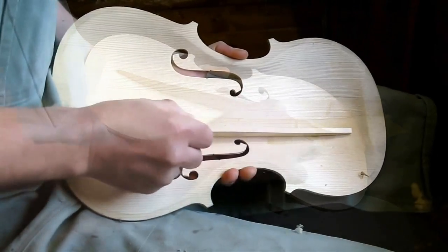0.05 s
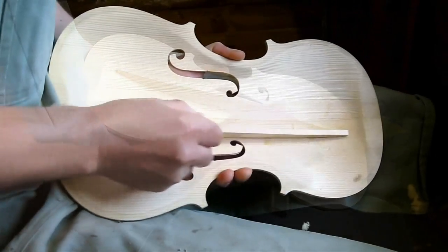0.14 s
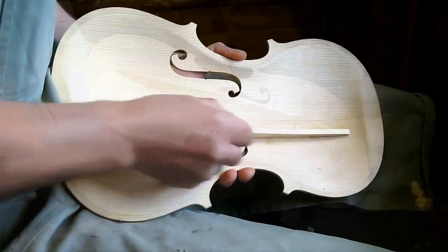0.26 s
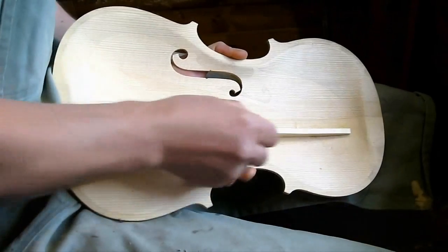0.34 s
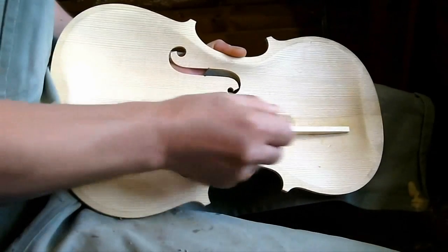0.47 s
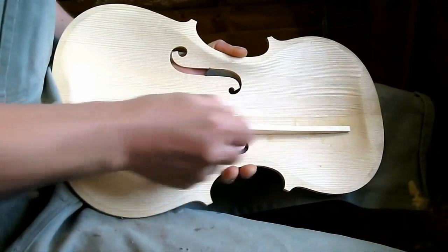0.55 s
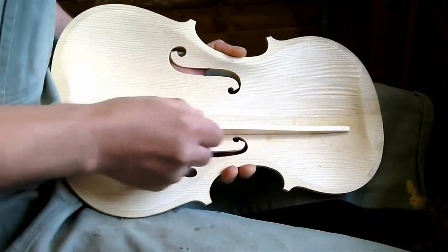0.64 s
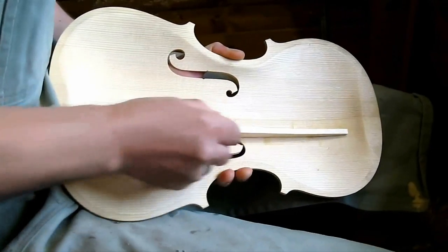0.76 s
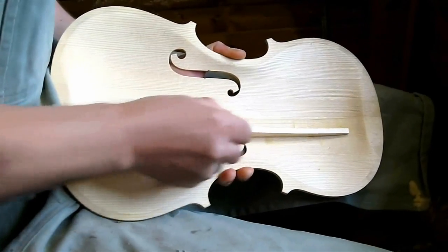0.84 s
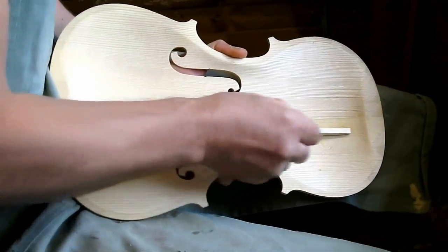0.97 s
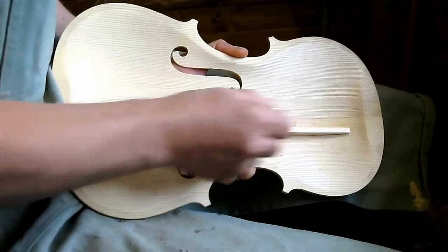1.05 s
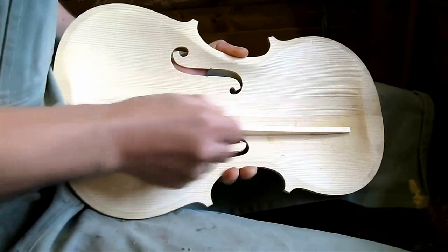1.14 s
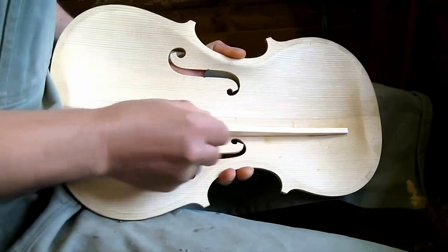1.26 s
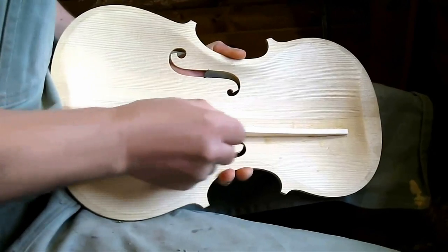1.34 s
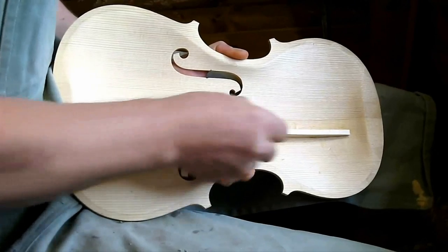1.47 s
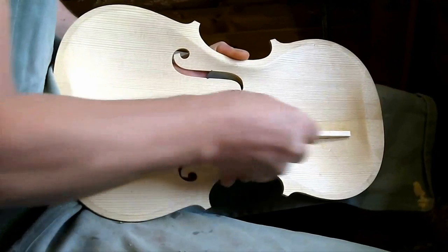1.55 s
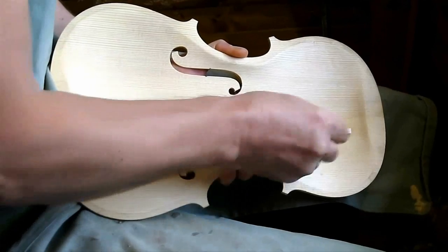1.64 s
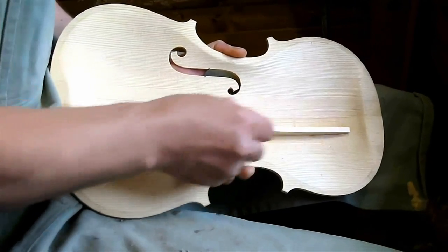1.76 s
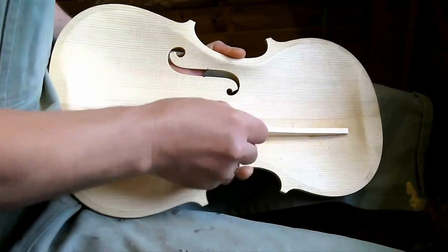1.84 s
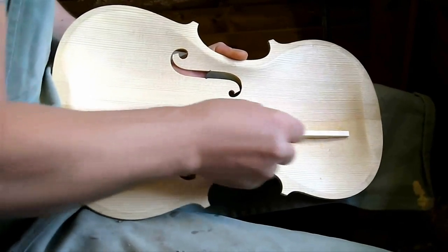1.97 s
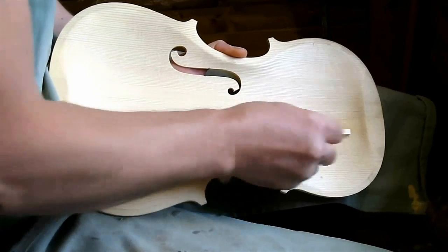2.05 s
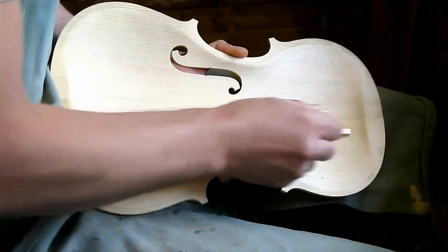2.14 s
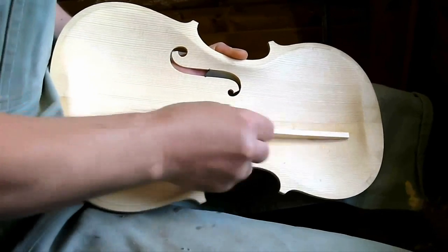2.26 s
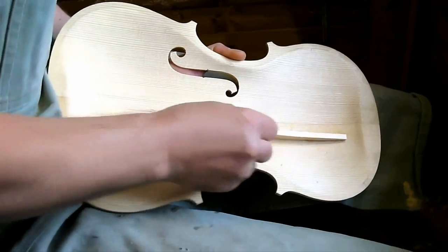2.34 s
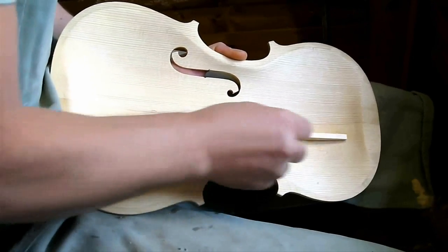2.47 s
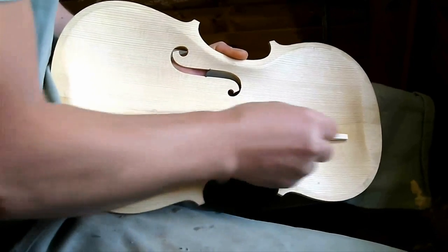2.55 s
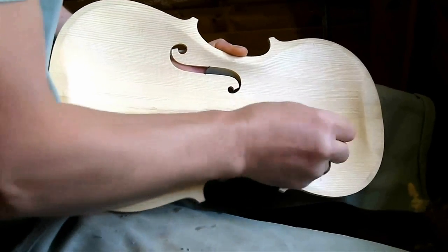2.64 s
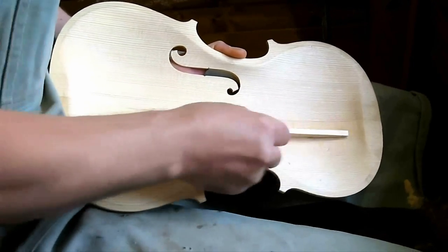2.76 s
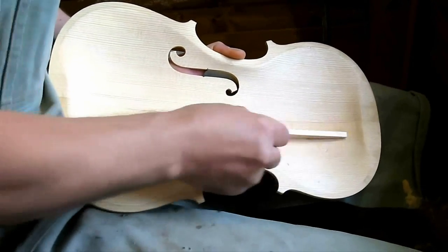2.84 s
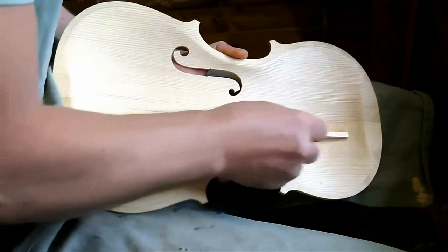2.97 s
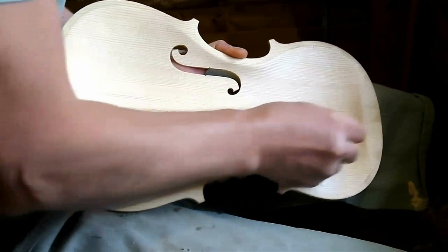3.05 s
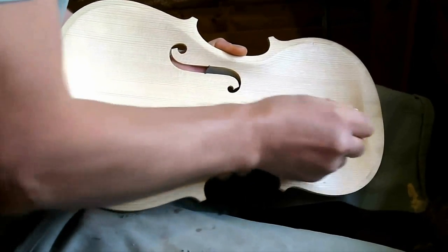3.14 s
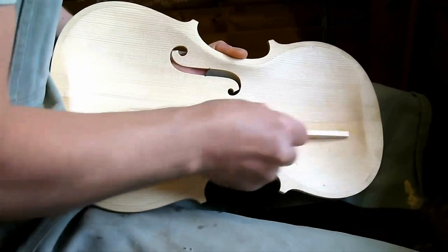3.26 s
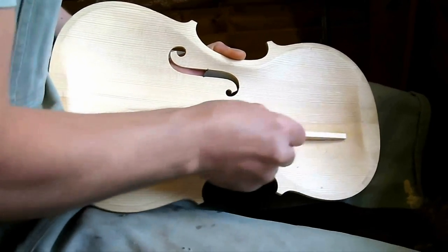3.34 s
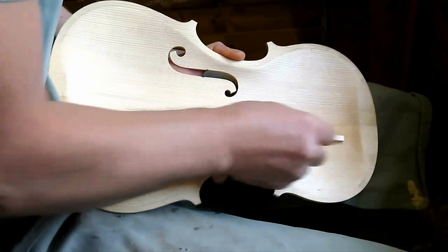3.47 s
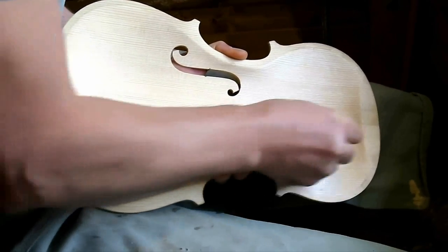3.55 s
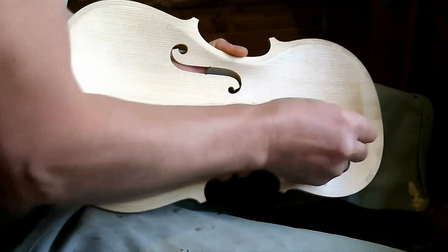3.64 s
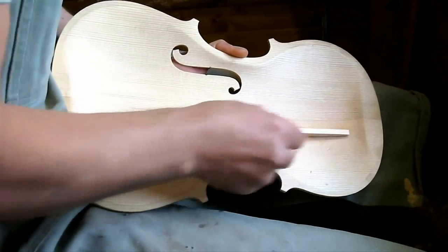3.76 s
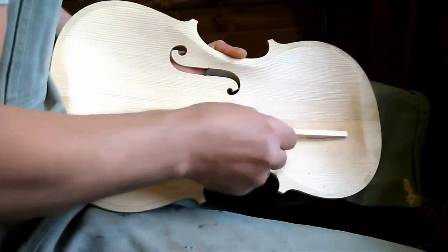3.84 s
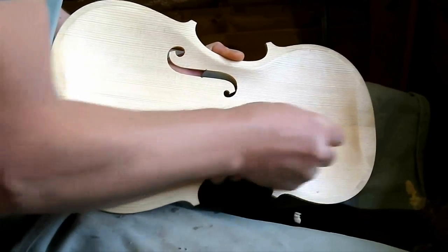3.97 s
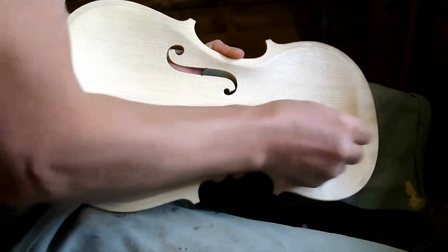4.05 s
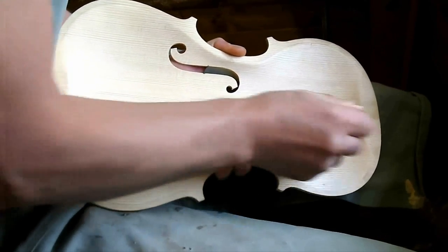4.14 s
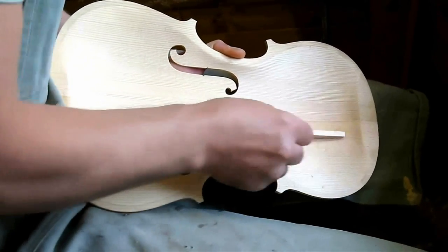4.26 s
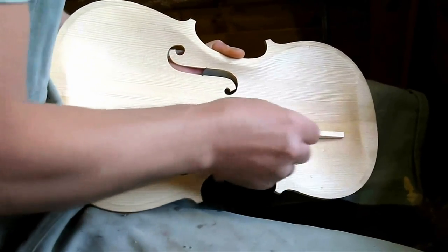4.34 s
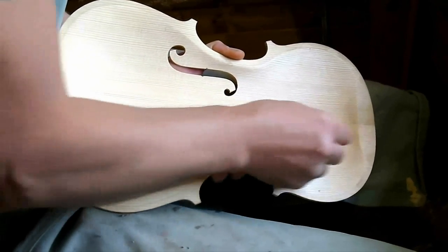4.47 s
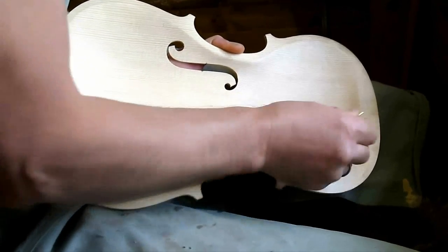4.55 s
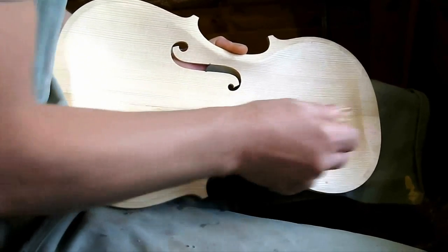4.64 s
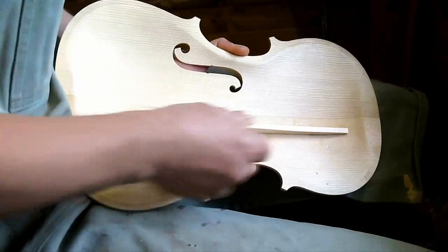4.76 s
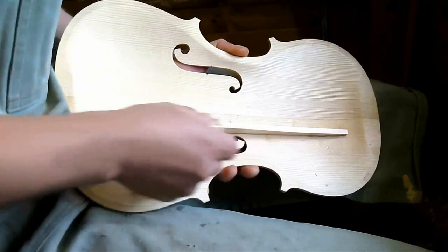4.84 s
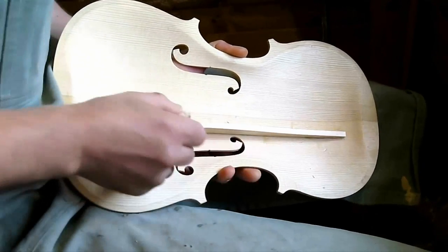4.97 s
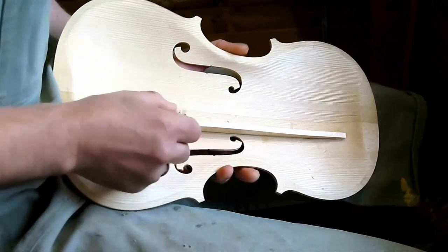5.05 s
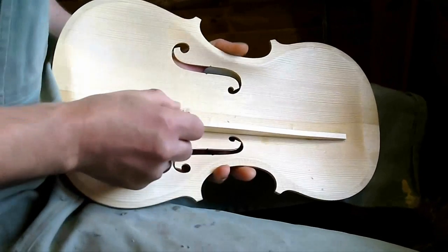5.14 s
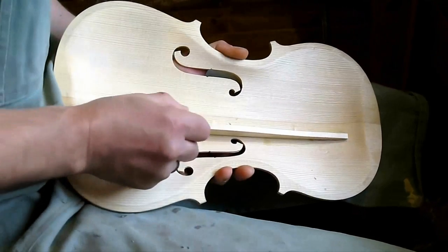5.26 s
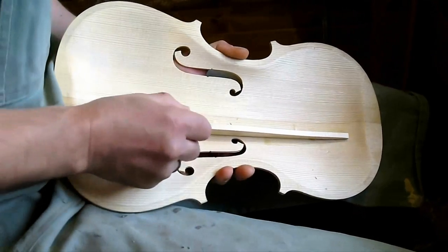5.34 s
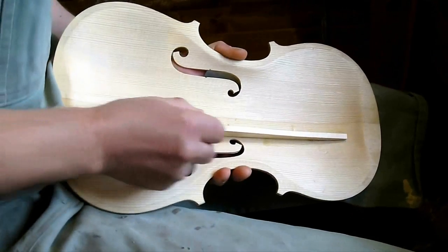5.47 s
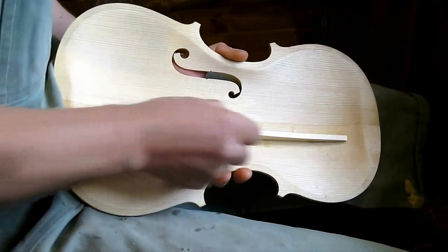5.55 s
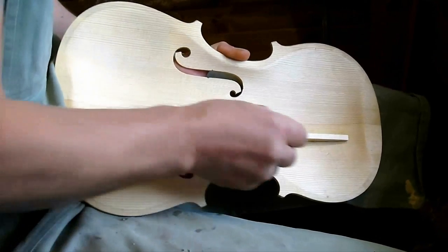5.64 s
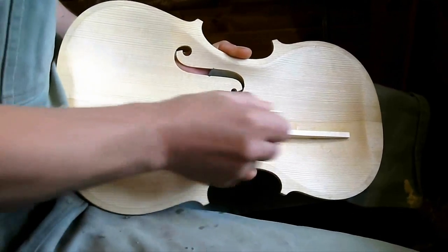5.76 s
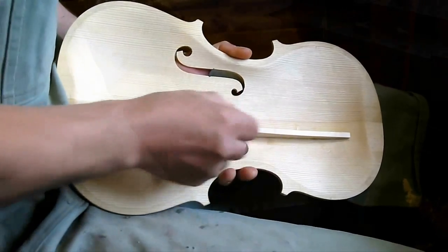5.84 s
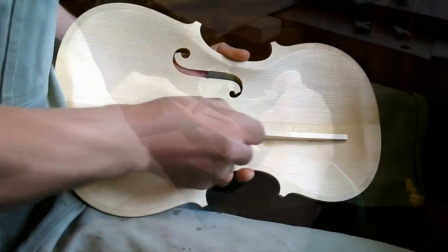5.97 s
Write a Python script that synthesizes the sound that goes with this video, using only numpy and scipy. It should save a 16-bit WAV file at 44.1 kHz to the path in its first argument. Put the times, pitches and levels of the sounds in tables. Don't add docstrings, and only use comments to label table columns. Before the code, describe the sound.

Woodworking heard very near: blade set down with a hard clack, then pushed, tearing fibres in stuttering lumps while the arched plate resonates in the midrange and the shaving hisses high. Short rushed scrapes first, then regular knock-and-push strokes, becoming lighter, a brief near-pause with tiny splinter ticks, one loosely gripped tap and a final rough stroke. Short, live room reflections, little bass, steady faint air noise, knocks clipping.

```python
import sys
import numpy as np
from scipy import signal
from scipy.io import wavfile

SR = 44100
rng = np.random.default_rng(int(sys.argv[2]) if len(sys.argv) > 2 else 0)


def wav_record(signal):
    frames = np.transpose(np.atleast_2d(signal))
    bounded = np.clip(frames, -1, 1)
    quanta = np.round(bounded * 32767).astype(np.int16)
    wavfile.write(sys.argv[1], SR, quanta)


def linear_from_db(decibels):
    return 10 ** (np.asarray(decibels, float) / 20)


N = 264587
LEFT_RIGHT = np.array([[1], [-1]])


def rms_one(x):
    return x / np.sqrt(np.mean(x ** 2) + 1e-20)


def low(x, hz):
    return signal.sosfilt(signal.butter(2, hz, fs=SR, output="sos"), x)


def high(x, hz):
    return signal.sosfilt(signal.butter(4, hz, "high", fs=SR, output="sos"), x)


def at_hz(points, hz, axis=1):
    points = np.array(points)
    return np.interp(np.log(hz), np.log(points[:, 0]), points[:, axis])


def drift(rate):
    r = np.exp(-40 * np.pi * rate / SR)
    slow = signal.lfilter([1], [1, -2 * r, r * r], rng.standard_normal(N // 20 + 2002))[2000:]
    return np.interp(np.arange(N) / 20, np.arange(len(slow)), rms_one(slow))


def ring(force, hz, t60):
    r, w = linear_from_db(-60 / (t60 * SR)), 2 * np.pi * hz / SR
    return signal.lfilter([0, np.sin(w)], [1, -2 * r * np.cos(w), r * r], force + 1e-18)


def clicks(times_s, db):
    out = np.zeros(N)
    out[(np.array(times_s) * SR).astype(int)] = linear_from_db(db)
    return out


def bands(low_hz, high_hz):
    edges = low_hz * 2 ** np.arange(0, np.log2(high_hz / low_hz) + .01, 1 / 3)
    return [(np.sqrt(a * b), signal.butter(2, [a, b], "band", fs=SR, output="sos"))
            for a, b in zip(edges, edges[1:])]


# (f/Hz, likeness/share)
LIKENESS = [(60, 0.66), (240, 1), (950, 0.53), (3770, 0.076), (15000, 0.38)]


def widen(mid, side, hz, alike_share):
    alike = np.clip(alike_share * at_hz(LIKENESS, hz), 0, 1)
    return np.sqrt(1 + alike) * mid + np.sqrt(1 - alike) * side * LEFT_RIGHT


# (f/Hz, left minus right level/dB)
LEAN = [(60, -0.5), (240, 0), (950, -1), (3770, -4.5), (15000, -1)]


def lean_gains(hz):
    return linear_from_db(at_hz(LEAN, hz) / 2 * LEFT_RIGHT)


def coloured(whites, spectrum, low_hz, high_hz, patchy_db, alike_share):
    out = 0
    for k, (hz, sos) in enumerate(bands(low_hz, high_hz)):
        mid, side = signal.sosfilt(sos, whites[k % 2])
        gain = linear_from_db(at_hz(spectrum, hz) + patchy_db * drift(11.0))
        out = out + gain * lean_gains(hz) * widen(mid, side, hz, alike_share)
    return rms_one(out)


def stroke(start_s, top_s, end_s, start_db, top_db, end_db, release_db_per_s):
    t = np.arange(0, N, 32) / SR
    held = np.interp(t, [start_s, np.clip(top_s, start_s, end_s), end_s], [start_db, top_db, end_db])
    onset_db_per_s = 899.5
    before_s, after_s = np.maximum(start_s - t, 0), np.maximum(t - end_s, 0)
    return held - onset_db_per_s * before_s - release_db_per_s * after_s


# (start t/s, lift t/s, top speed as hiss level/dB, climb to it/dB, rasp of the grain/dB)
SLIDES = [(0, 0.043, -55.5, -6, 0.5), (0.084, 0.178, -42, 3, -1.5), (0.225, 0.344, -45.5, -3.5, -3.5),
          (0.387, 0.503, -37.5, 4.5, -1), (0.873, 1.075, -36, 9.5, -1.5), (1.395, 1.694, -36.5, 15.5, 0),
          (1.964, 2.19, -42, 15, 1.5), (2.453, 2.705, -40, 16.5, 2), (2.946, 3.212, -40, 14, 0.5),
          (3.473, 3.682, -40, 14.5, -2.5), (3.98, 4.153, -43, 11, 3), (4.428, 4.622, -43, 13.5, 1.5),
          (4.87, 5.06, -71.5, 5, 8), (5.12, 5.18, -66, 7, 8.5), (5.357, 5.367, -52.5, 12, 7.5),
          (5.519, 5.763, -37, 13.5, 3.5)]
# (bites t/s, deepest t/s, leaves t/s, depth as plate level/dB, weight on the lap/dB)
CUTS = [(0, 0.01, 0.16, -42, -18.5), (.2, 0.218, 0.25, -36, -16), (.26, 0.292, 0.37, -29.5, -19),
        (0.378, 0.406, 0.47, -17.5, -30.5), (0.426, 0.482, 0.5, -19.5, -27.5),
        (0.889, 0.938, .98, -19, -23), (0.967, 1.024, 1.055, -16, -25), (1.369, 1.443, 1.58, -25.5, -16.5),
        (1.494, 1.548, 1.675, -17, -23.5), (1.987, 2.054, 2.074, -26.5, -31),
        (2.045, 2.106, 2.2, -23, -33.5), (2.453, 2.561, 2.597, -23.5, -33),
        (2.627, 2.636, 2.697, -26, -25.5), (2.934, 3.039, 3.153, -29, -34),
        (3.47, 3.543, 3.635, -30.5, -37), (3.655, 3.684, 3.677, -24, -25.5),
        (3.956, 3.978, 4.09, -33.5, -31), (4.077, 4.12, 4.15, -38, -19.5), (4.437, 4.45, 4.62, -39, -16.5),
        (4.549, 4.59, 4.525, -32.5, -21), (5.126, 5.162, 5.14, -44, -19),
        (5.512, 5.563, 5.82, -26.5, -24.5), (5.61, 5.654, 5.66, -23.5, -12.5), (5.7, 5.74, 5.665, -18, -32)]


def pushes():
    speed_up_share = .8
    bite_loss_db, leave_loss_db = 9, 5
    slides = np.array([stroke(a, a + speed_up_share * (b - a), b, db - climb_db, db, db, 301)
                       for a, b, db, climb_db, _ in SLIDES])
    cuts = np.array([stroke(a, m, b, db - bite_loss_db, db, db - leave_loss_db, 253)
                     for a, m, b, db, _ in CUTS])
    depth = cuts.max(axis=0)
    lap = (cuts + np.array(CUTS)[:, 4:]).max(axis=0)
    by_speed, by_depth, skimming_db = 0.96, 0.19, -55
    rasp = (by_speed * (slides + 40) + np.array(SLIDES)[:, 4:]).max(axis=0)
    chatter = -33 + rasp + by_depth * (np.maximum(depth, skimming_db) + 28.5)
    return [np.repeat(linear_from_db(db), 32)[:N] for db in (depth, lap, chatter, slides.max(axis=0))]


def fibres(per_s, spread_db, judder_db):
    sizes = linear_from_db(spread_db * np.minimum(rng.exponential(1, N), 5)) * rng.choice([-1, 1], N)
    torn = rng.random(N) < per_s / SR
    return rms_one(sizes * torn * linear_from_db(judder_db))


def modes(table, tearing, blows, place_db, turn):
    out, steady, struck = 0, 0, np.flatnonzero(blows)
    for k, (hz, level_db, t60) in enumerate(table):
        t60 = min(t60, 34 / hz)
        steady += linear_from_db(2 * level_db) * t60 * SR / (4 * np.log(1000))
        force = linear_from_db(place_db * drift(4.0)) * tearing
        force[struck] += blows[struck] * linear_from_db(rng.normal(0, 3, len(struck)))
        sound = (-1) ** k * linear_from_db(level_db) * ring(force, hz, t60)
        aim, lag = rng.normal(0, 1, 2)
        lean = linear_from_db(at_hz(LEAN, hz) / 2 + aim)
        shift = int(np.clip(abs(turn * lag), 0, 9))
        left = lean * np.roll(sound, shift * (lag > 0))
        right = np.roll(sound, shift * (lag < 0)) / lean
        out = out + np.array([left, right])
    return out / np.sqrt(steady)


# (f/Hz, level/dB, t60/s)
PLATE = [(403, -35, 0.014), (476, -6, 0.027), (504, -35, .045), (531.3, 0.5, 0.11), (557.5, -6, 0.12),
         (600, -12.5, 0.1), (682, -0.5, 0.057), (640.5, 8.5, 0.029), (719, 4, 0.05), (813, 14, 0.019),
         (890, 1, 0.042), (898, 5, 0.06), (978, 10, 0.018), (1054, 10.5, 0.02), (1200, 6, 0.0086),
         (1277, -2, 0.063), (1244, 0, 0.09), (1367, 3.5, 0.035), (1400, -16.5, 0.0223), (1508, -7, 0.04),
         (1720, -17, 0.042)]


def plate_rings(gain, judder, knock):
    tearing = gain * fibres(1800, 2.6, 2.22 * judder)
    return modes(PLATE, tearing, linear_from_db(13.0) * knock, place_db=4.0, turn=1.2)


# (f/Hz, level/dB, t60/s)
UPPER = [(1777, -11, 0.031), (1855, 3, 0.0088), (1917, -9.5, 0.04), (2150, -0.5, 0.0054),
         (2363, -10.5, 0.015), (2540, -3.5, 0.0096), (2690, -18, 0.01), (2830, -13, 0.0091),
         (3227, -7.5, 0.0059), (3137, -10.5, 0.014), (3330, -10.5, .011), (3603, -4.5, .011),
         (3658, -5, .014), (4200, -10.5, 0.0044), (4410, -14, 0.0086)]


def blade_chatter(gain, judder, knock):
    tearing = gain * fibres(4000, 0.97, 1.46 * judder + 0.65 * drift(47))
    return modes(UPPER, tearing, linear_from_db(8) * knock, place_db=3.5, turn=3.0)


KNOCK_S = [.7515, 1.3377, 1.9349, 2.4254, 2.9145, 3.421, 3.9419, 4.4019, 5.1876]
# (blow level/dB, lowest bar ring f/Hz, middle rings level/dB, top ring level/dB, crack level/dB)
KNOCKS = [
    (-7, 843, 0, -28, -22),
    (-6.5, 870, -4.5, -32.5, -29),
    (-4, 827, -2, -7, -17.5),
    (-7.5, 827, 1, -1, -21.5),
    (-4, 830, -1.5, -3.5, -24.5),
    (-1.5, 633, -1.5, 0.5, -19),
    (-3, 652, -8, -17, -26.5),
    (-2, 651, -6, -13.5, -24.5),
    (-13.5, 810, 8, 1, -24),
]
# (t/s, blow level/dB, lowest bar ring f/Hz, brightness/dB)
CATCHES = [(0.033, -28.5, 550, -25), (0.206, -28, 885, -15), (0.228, -24, 644, -11), (0.267, -22, 940, -12),
           (0.345, -19, 799, -20.5), (0.378, -14.5, 760, -22), (0.449, -17.5, 800, -20),
           (0.464, -8, 960, -31), (0.904, -18, 735, -17), (0.925, -15, 835, -13), (0.958, -11, 654, -36),
           (1.047, -8, 813, -9.5), (1.483, -13.5, 637, -29), (1.541, -10, 740, -21),
           (1.565, -13.5, 860, -20), (2.636, -14.5, 770, -24), (3.43, -20, 900, -1),
           (3.678, -21.5, 643, -26), (3.701, -25, 600, -25), (5.1946, -12.5, 930, -1.5),
           (5.198, -13.5, 877, -4), (5.495, -29, 564, -19), (5.519, -23.5, 620, -12),
           (5.542, -20.5, 686, -13), (5.616, -23, 780, -10), (5.629, -16.5, 929, -7),
           (5.644, -16.5, 726, -2), (5.784, -14.5, 856, -4.5)]
# (f/Hz, level/dB, t60/s)
BAR = [(1080, 7, 0.0046), (1526, -1.5, 0.014), (1996, 2, 0.0096), (2848, -9, 0.011), (3490, -3, 0.007),
       (4610, -16, 0.019)]
# (f/Hz, level/dB, t60/s)
FREE_RING = [(1166, -19.5, 0.13), (1387, -19.5, 0.13), (1650, -32, 0.23)]


def bar_knocks():
    length, contact_hz, scatter = 2000, 3910, .02
    out, tap = np.zeros((2, N)), np.eye(1, length)[0]
    soft = low(low(tap, contact_hz), 2.3 * contact_hz)
    crack_dying = linear_from_db(-60 * np.arange(length) / SR / 0.023)
    heavy = [(s, db, hz, -4 + (0.27 - 1) * db, *rest) for s, (db, hz, *rest) in zip(KNOCK_S, KNOCKS)]
    landing_lag_s = 0.001483
    light = [(s + landing_lag_s, db - 0.5, hz, -4.5, bright_db - 3, bright_db, bright_db - 17)
             for s, db, hz, bright_db in CATCHES]
    for s, blow_db, lowest_hz, second_db, middle_db, top_db, crack_db in heavy + light:
        crack = rng.standard_normal((2, length)) * crack_dying
        hit = linear_from_db(crack_db) * low(high(crack, 5500), 9000)
        hit += ring(soft, lowest_hz, 0.024)
        shares_db = [second_db, middle_db, middle_db, middle_db, top_db, top_db]
        for (hz, db, t60), share_db in zip(BAR, shares_db):
            shifted_hz = hz * (1 + scatter * rng.normal())
            hit += linear_from_db(db + share_db) * lean_gains(hz) * ring(soft, shifted_hz, t60)
        out[:, int(s * SR):int(s * SR) + length] += linear_from_db(blow_db) * hit
    last = low(low(clicks(KNOCK_S[-1:], 0), 3100), 3200)
    for k, (hz, db, t60) in enumerate(FREE_RING):
        out += (-1) ** k * linear_from_db(db) * ring(last, hz, t60)
    return out


# (f/Hz, level/dB per Hz)
HISS = [(2350, -29), (4000, -5.5), (5350, -5), (7660, -6.5), (8750, -10.5), (11400, -15), (14000, -18),
        (16000, -35.5)]


def shaving_hiss(gain, judder):
    grains = np.array([fibres(6000, 0.81, 1.4 * judder + 1.74 * drift(38)) for _ in range(2)])
    whites = [grains, np.roll(grains, 9000)]
    return gain * coloured(whites, HISS, 3590, 17000, patchy_db=2.7, alike_share=1.0)


# (f/Hz, level/dB per Hz)
THUMP = [(35, -57), (60, -31), (149, -10.5), (210, -6), (246, -13), (400, -2), (520, -31), (880, -120)]


def lap_thump(gain):
    whites = rng.standard_normal((2, 2, N))
    return gain * coloured(whites, THUMP, 60, 420, patchy_db=2, alike_share=1)


def lap_push(knock):
    firm = np.arange(N) < (KNOCK_S[-1] - .1) * SR
    return linear_from_db(2.0) * low(knock * firm, 450)


# (t/s, peak level/dB)
SNAPS = [(0.082, -39), (0.1034, -24.5), (0.1436, -33), (0.153, -21), (0.165, -26), (0.6005, -35),
         (0.9976, -20), (2.888, -37.5), (3.1108, -33), (4.7344, -49), (4.9415, -29.5), (5.0164, -42.5),
         (5.3732, -46)]


def snaps():
    times_s, peaks_db = np.transpose(SNAPS)
    tick = clicks(times_s, peaks_db)
    rings = [(6650, -4, 0.0028), (9600, -2, 0.0021), (13000, -7.5, 0.0023)]     # f/Hz, level/dB, t60/s
    return high(sum(ring(tick, hz, t60) * linear_from_db(db) for hz, db, t60 in rings), 4200)


# (f/Hz, t60/s, level/dB)
ROOM = [(151, 0.83, -7.5), (360, 0.46, -4.5), (1080, 0.44, -3.5), (3440, 0.45, -1), (4480, 0.5, -5),
        (7960, 0.3, -4), (14000, 0.11, -6.5)]


def room(x, count=4):
    t, tails = np.arange(int(.6 * SR)) / SR, 0
    whites = rng.standard_normal((2, 2, count, 1, len(t)))
    arriving = np.clip((t - .003) / 0.0011, 0, 1)
    for k, (hz, sos) in enumerate(bands(85.1, 17000)):
        mid, side = signal.sosfilt(sos, whites[k % 2])
        t60 = at_hz(ROOM, hz)
        dying = linear_from_db(-60 * t / t60) * arriving / np.sqrt(t60 * SR / 14)
        level = linear_from_db(at_hz(ROOM, hz, axis=2))
        tails = tails + level * dying * widen(mid, side, hz, 1.25) / np.sqrt(2)
    pose = np.arange(N) / SR / .11
    out = 0
    for k, tail in enumerate(tails):
        away = abs((pose - k + count / 2) % count - count / 2)
        weight = np.sqrt(np.clip(1 - away, 0, 1))
        out = out + signal.fftconvolve((x * weight)[None], tail, axes=1)[:, :N]
    return out


# (f/Hz, level/dB per Hz)
AIR = [(15, -38), (25, -5), (180, 7.5), (863, 0.5), (1260, 1), (2840, 0), (4490, -9.5), (5430, -5.5),
       (6920, -12), (12900, -16), (16000, -29)]
# (f/Hz, width/Hz, level/dB)
FAN = [
    (2760, 140, -66.5),
    (5505, 270, -63.5),
]


def fan():
    whites = rng.standard_normal((2, 2, N))
    air = linear_from_db(-55) * coloured(whites, AIR, 24.67, 17000, patchy_db=0.6, alike_share=0.51)
    for hz, width_hz, db in FAN:
        t60 = np.log(1000) / np.pi / width_hz
        air += linear_from_db(db) * rms_one(ring(ring(rng.standard_normal((2, N)), hz, t60), hz, t60))
    return air


def scene():
    plate, thump, chatter, hiss = pushes()
    knock = clicks(KNOCK_S, np.array(KNOCKS)[:, 0])
    judder = drift(87) + 0.65 * drift(20)
    wood = plate_rings(plate, judder, knock) + blade_chatter(chatter, judder, knock)
    wood = low(low(wood, 5600), 9000) + bar_knocks()
    wood = high(wood, 492)
    dry = wood + shaving_hiss(hiss, judder) + lap_thump(thump) + lap_push(knock) + snaps()
    return dry + room(dry.mean(axis=0)) + fan()


def low_pass(x):
    return signal.sosfilt(signal.butter(12, 16430, fs=SR, output="sos"), x)


def record(dry):
    clipped = np.clip(dry, -1, 1)
    mix = signal.sosfilt(signal.cheby2(8, 50, 16500, fs=SR, output="sos"), clipped)
    return low_pass(mix)


dry = scene()
out = record(dry)
wav_record(out)
```